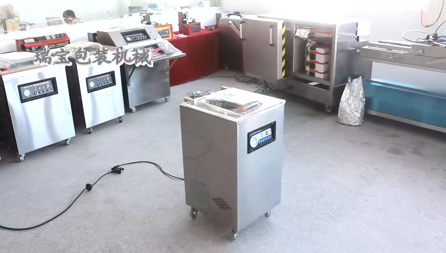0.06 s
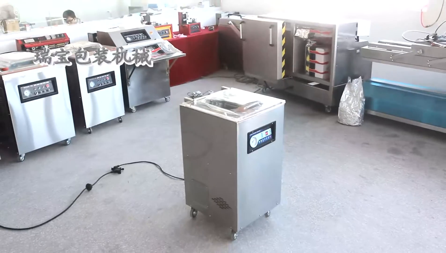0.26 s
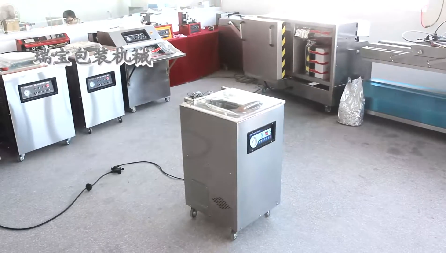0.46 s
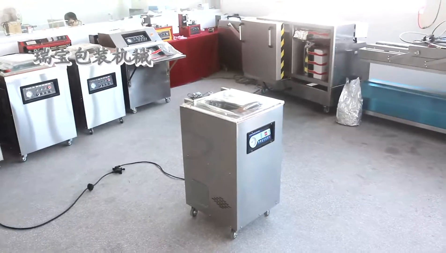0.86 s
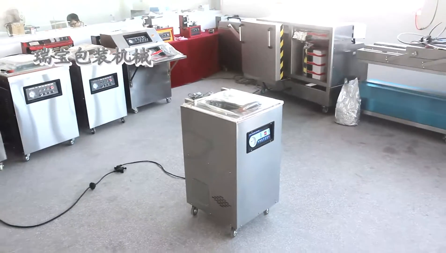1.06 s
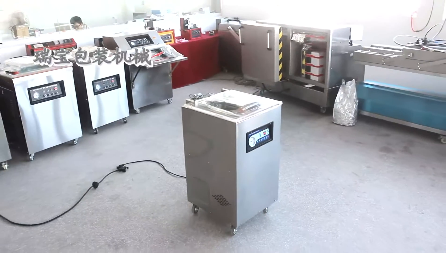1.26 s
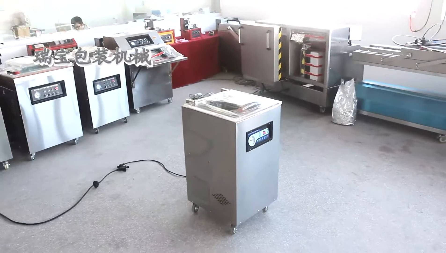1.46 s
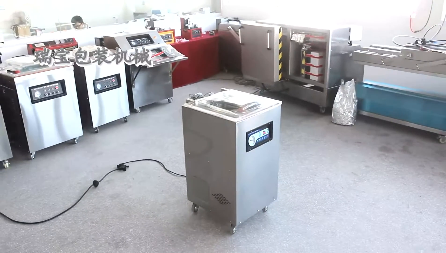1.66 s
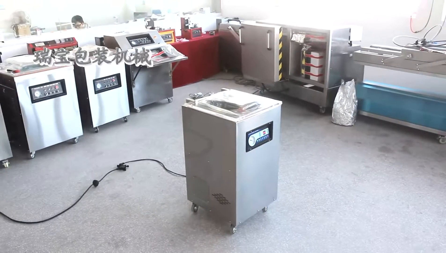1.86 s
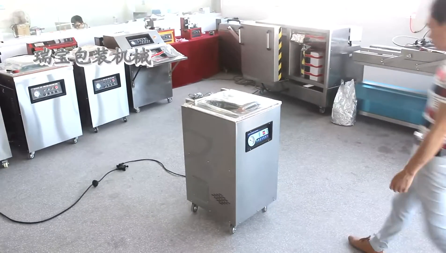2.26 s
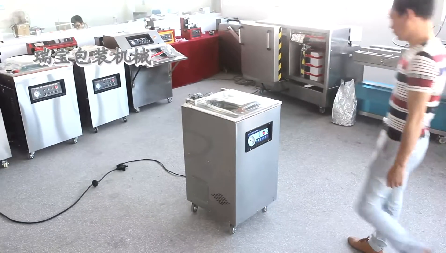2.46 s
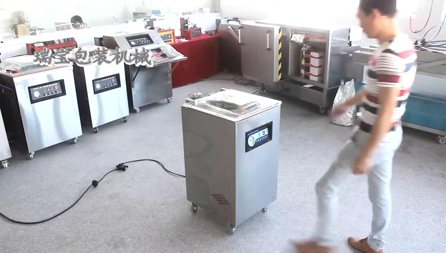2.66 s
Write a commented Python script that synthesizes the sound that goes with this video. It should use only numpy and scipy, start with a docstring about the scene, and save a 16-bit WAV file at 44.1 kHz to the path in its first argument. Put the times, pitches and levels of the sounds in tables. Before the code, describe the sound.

A loud hiss of air fills a vacuum packing machine a few metres away in a workshop. After a brief low motor drone, the valve opens at 0.2 seconds with a thump and a spit. The hiss rings the steel chamber with a breathy whistle, steadily sinking in pitch, then fades from about 2.1 to 2.8 seconds. Faint low tones swell midway, and soft footsteps scuff near 1.2 and 2.1 seconds.

```python
"""A vacuum packing machine lets air back into its chamber, a few metres away in a workshop.
At first, machines drone and rumble in the hall. Then the valve opens with a thump and a spit of air,
and the background drops. The jet of air hisses and rings the steel chamber, sinking in pitch as the
chamber fills. Midway, faint low tones swell and fade, and a man walks up with soft steps.
At last the hiss dies away as the pressures inside and outside meet."""
import sys
import numpy as np
from scipy import signal
from scipy.fft import rfft, irfft, next_fast_len
from scipy.io import wavfile
from scipy.ndimage import uniform_filter1d

SR = 44100
rng = np.random.default_rng(int(sys.argv[2]) if len(sys.argv) > 2 else 0)


def to_wav(sig):
    """Store sig (one row per channel, or 1-D mono) as 16-bit WAV at the path in sys.argv[1].

    Samples outside -1..1 are clipped; the rate is SR.
    """
    pcm = np.clip(np.atleast_2d(sig), -1, 1) * 32767
    pcm = np.round(pcm).astype(np.int16)
    wavfile.write(sys.argv[1], SR, pcm.T)  # frames by channels


N = 123479  # samples, about 2.8 s
OPEN_S, OPENING_S = 0.195, 0.0091  # when the valve starts to open, and how long it takes


def jet(t, band_count=80):
    """Swirling air hisses into the chamber; the hiss and its whistle sink as the air slows down."""
    # strength of the jet: t/s, relative level/dB
    flow_levels = [(0.21, -26), (0.22, -15), (0.28, -13.5), (0.37, -10), (0.4, -14), (0.47, -11.5),
                   (1.99, -12), (2.15, -14), (2.79, -31.5)]
    # loudest pitch of the jet, which follows the air speed: t/s, f/Hz
    pitch_path = [(.2, 5100), (.8, 4710), (1.1, 4190), (1.45, 3600), (1.65, 3230), (2.05, 2360),
                  (2.3, 1900), (2.55, 1700), (2.8, 1570)]
    # shape of the hiss around that pitch: multiple of the pitch, relative level/dB
    hiss_shape = [(.015, -31), (.035, -16), (.12, -10), (.3, -6), (.65, -1.5), (1, -0.5), (1.35, -1.5),
                  (1.75, -7), (2.5, -14.5), (4, -24.5), (7, -32.5), (13, -41)]
    # a breathy whistle stands out at that pitch while the air is fast: t/s, boost/dB
    whistle_boosts = [(.2, 2.5), (.8, 1.5), (1.15, 3), (1.7, 5), (2.05, 4.5), (2.3, -1.5), (2.8, -2.7)]
    whistle_width_hz = 430
    gain_db, flutter_db, flicker_db = 1, 0.71, 0.69
    pitch, whistle_db = curve(t, pitch_path), curve(t, whistle_boosts)
    size = next_fast_len(N)
    ringing = rfft(chamber(rng.standard_normal(N)), size)
    # Cut the ringing noise into overlapping bands, so that each can rise and fall by itself.
    centres_hz = np.geomspace(540, 17500, band_count) - 500
    band_position = np.interp(np.arange(len(ringing)) * SR / size, centres_hz, np.arange(band_count))
    hiss, power = 0, 0
    for k, hz in enumerate(centres_hz):
        share = np.maximum(1 - np.abs(band_position - k), 0)
        band = irfft(ringing * share, size)[:N]
        near_pitch = np.exp(-((hz - pitch) / whistle_width_hz) ** 2)
        gain = undb(log_curve(hz / pitch, hiss_shape) + whistle_db * near_pitch)
        hiss = hiss + band * gain * undb(flicker_db * wobble(rate_hz=14))
        power = power + np.var(band) * gain ** 2
    even_hiss = unit(hiss / np.sqrt(power))  # equally strong wherever the pitch is
    level_db = gain_db + curve(t, flow_levels) + flutter_db * wobble(rate_hz=44.88)
    return even_hiss * valve(t) * undb(level_db)


def chamber(sound):
    """The air in the steel chamber rings at a few clear pitches and countless weaker ones."""
    # clearest ringing pitches: f/Hz, relative level/dB
    rings = [(614, -2), (1362, 1.5), (1514, 5.5), (2012, 2.5), (2519, 0), (3117, 0.5), (3758, -3.5),
             (3973, 2), (4177, -11), (4861, 4), (4969, -2), (5760, 5), (6508, -21), (6864, -8)]
    # steady tone colour of the chamber and cabinet: f/Hz, gain/dB
    colour = [(40, -24), (65, -12), (120, 0), (280, -5), (450, -2.5), (630, -1), (950, -4), (1350, .5),
              (1750, -.5), (2800, .5), (3500, -1), (4400, -.5), (4900, 1.5), (5500, -.5), (6800, 1.5),
              (7600, -2.5), (9000, -2), (10000, -4), (11800, -1.5), (13000, -4.5), (15500, -3)]
    ring_width_hz, ring_db, tail_db = 16.5, -1, -2.5
    t, f = np.arange(N) / SR, freqs()
    tail = rng.standard_normal(N) * fade(t, t60_s=0.41)  # the weaker rings and the hall's echo
    tail_response = undb(tail_db) * rfft(tail) / np.sqrt(np.sum(tail ** 2))
    direct_and_tail = (1 + tail_response) / np.hypot(1, undb(tail_db))
    clear = sum(undb(db + ring_db) / (1 + 2j * (f - hz) / ring_width_hz) for hz, db in rings)
    return irfft(rfft(sound) * (direct_and_tail + clear) * undb(log_curve(f, colour)), N)


def valve(t):
    """How far the valve is open, from 0 (shut) to 1."""
    return np.clip((t - OPEN_S) / OPENING_S, 0, 1)


def spit(t):
    """A short burst of air spits through the valve as its seal breaks."""
    # tone colour of the burst: f/Hz, relative level/dB
    colour = [(200, -7.5), (500, -0.5), (850, -3), (1200, 3), (2200, 3), (3300, -7), (5500, -4),
              (8500, -1.5), (12000, -7), (15500, -15)]
    level_db, hold_s = -11.5, 0.025
    burst = noise(undb(log_curve(freqs(), colour))) * undb(level_db)
    return burst * valve(t) * fade(t - OPEN_S - hold_s, t60_s=0.42)


def thump(t):
    """The sudden change in pressure jolts the lid and cabinet, and the hall booms after it."""
    # notes of the jolted lid and cabinet: f/Hz, level/dB, time to fade by 60 dB/s
    notes = [(122, -11, 0.11), (99.5, -38, 0.49), (150, -43, 0.29)]
    start_s, rise_s = 0.2, 0.015
    age = np.maximum(t - start_s, 0)
    body = sum(undb(db) * np.sin(2 * np.pi * hz * age) * fade(age, t60_s) for hz, db, t60_s in notes)
    boom = undb(-20.5) * band_noise(hz=129, width_hz=92) * fade(age, t60_s=0.81)
    return (body + boom) * (1 - fade(age, rise_s))


def steps(t):
    """A man's shoes make dull scuffs on the concrete floor."""
    # soft footfalls: t/s, level/dB
    footfalls = [(1.161, -28.5), (2.148, -23.5), (2.48, -33)]
    loudness = sum(undb(db) * (t > start) * fade(t - start, t60_s=0.21) for start, db in footfalls)
    return band_noise(hz=560, width_hz=430) * loudness


def machine(t):
    """A deep machine rumble ends as the valve opens; later, faint low tones come and go."""
    # tones that swell inside the rush of air: middle t/s, half length/s, f/Hz, level/dB
    swells = [(0.99, .3, 242, -40), (1.354, .12, 445, -36), (1.34, 0.21, 616, -35), (1.82, 0.12, 940, -39)]
    rumble = undb(-37) * band_noise(hz=40.2, width_hz=15) * fade(t - OPEN_S, t60_s=0.2)
    hoots = sum(hum(hz, db) * np.exp(-((t - middle) / half) ** 2) for middle, half, hz, db in swells)
    return rumble + valve(t) * hoots


def hall(t):
    """Workshop noise and droning motors, both quieter once the air rushes."""
    # tone colour of the workshop noise: f/Hz, relative level/dB
    colour = [(30, -4), (60, -6), (120, -0.5), (220, -7), (400, -5.5), (600, -13.5), (1100, -19.5),
              (2100, -23.5), (4000, -34), (8000, -39), (15000, -42)]
    # drone of the motors: f/Hz, level before the valve opens/dB
    motor_notes = [(108, -45), (124, -42.5)]
    noise_db, dip_db = -33.5, -7.5
    workshop = undb(noise_db) * noise(undb(log_curve(freqs(), colour)))
    motors = sum(hum(hz, db) for hz, db in motor_notes)
    return (workshop + motors) * undb(dip_db * valve(t))


def hum(hz, db):
    """A tone that wavers in level and pitch."""
    peak = undb(db + 3.95 * wobble(rate_hz=6.92)) * np.sqrt(2)
    pitch = hz * (1 + 0.01146 * wobble(rate_hz=18))
    return peak * np.sin(2 * np.pi * np.cumsum(pitch) / SR)


def band_noise(hz, width_hz):
    """Noise in one steep-sided band around hz."""
    return noise(1 / (1 + (2 * (freqs() - hz) / width_hz) ** 4))


def noise(gain):
    """Noise of strength 1, shaped by a gain at each frequency."""
    return unit(irfft(rfft(rng.standard_normal(N)) * gain, N))


def wobble(rate_hz):
    """A smooth random wiggle of strength 1 that takes rate_hz new values a second."""
    hold = max(int(SR / rate_hz), 1)
    jumps = rng.standard_normal(N)[np.arange(N) // hold]
    return unit(uniform_filter1d(uniform_filter1d(jumps, hold), hold))


def fade(age, t60_s):
    """Stay at 1 until age 0, then fall by 60 dB every t60_s seconds."""
    return np.exp(-np.log(1000) * np.maximum(age, 0) / t60_s)


def undb(db):
    """Turn decibels into a number to multiply by."""
    return 10 ** (np.asarray(db) / 20)


def unit(x):
    """Scale to an average strength (rms) of 1."""
    return x / np.sqrt(np.mean(x ** 2))


def curve(x, table):
    """Join the rows of a table with straight lines and read off the value at x."""
    return np.interp(x, *np.array(table, float).T[:2])


def log_curve(x, table):
    """Like curve, but every doubling of x is an equal step."""
    points, db = np.array(table, float).T
    return np.interp(np.log(x), np.log(points), db)


def freqs():
    """The frequency in Hz of each point in a spectrum, at least 1."""
    return np.maximum(np.arange(N // 2 + 1) * SR / N, 1)


def scene():
    """Add up all the sources, the same on the left and right."""
    t = np.arange(N) / SR
    mix = jet(t) + spit(t) + thump(t) + machine(t) + steps(t) + hall(t)
    return np.array([mix, mix])


def record(dry):
    """Round off the highest peaks and cut the very top of the treble."""
    top_hz = 15750
    rounded = dry / (1 + dry ** 8) ** (1 / 8)
    return signal.sosfilt(signal.ellip(10, .2, 70, top_hz, fs=SR, output="sos"), rounded)


dry = scene()
out = record(dry)
to_wav(out)
```